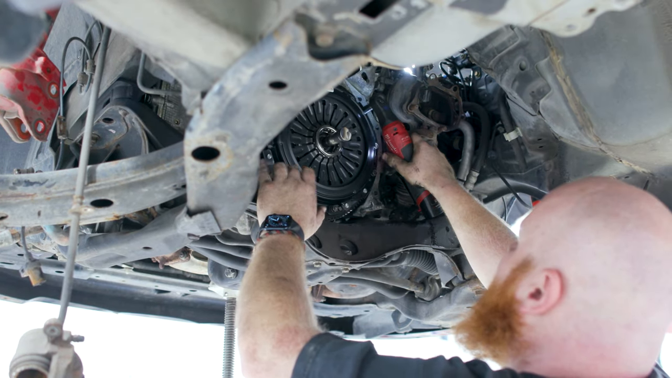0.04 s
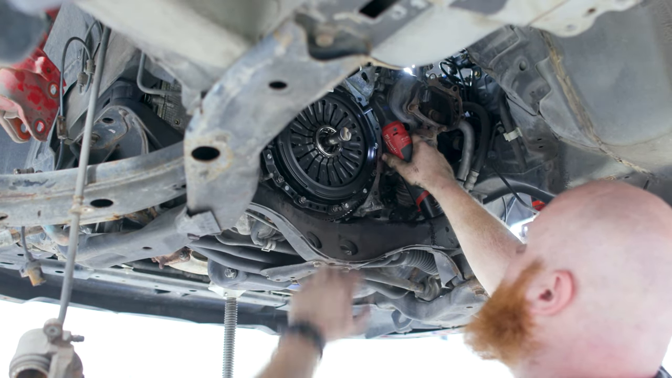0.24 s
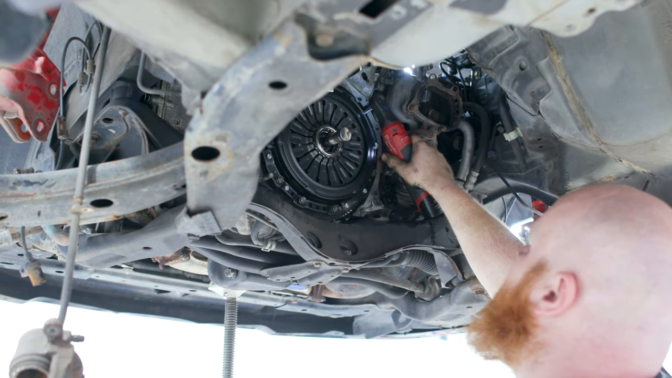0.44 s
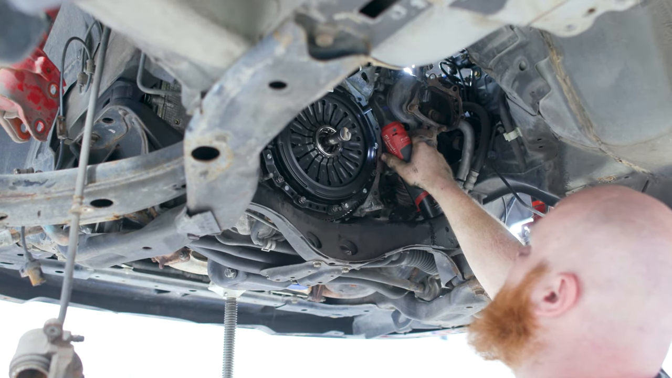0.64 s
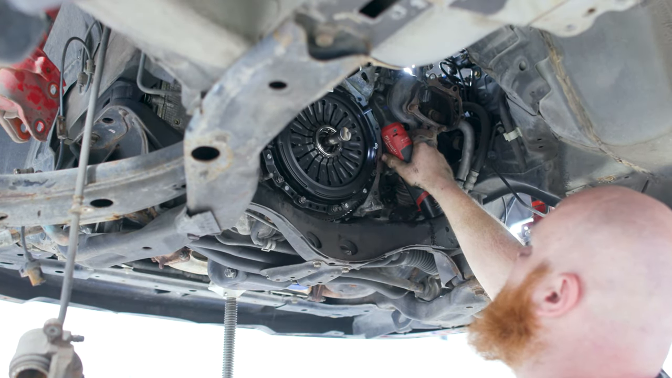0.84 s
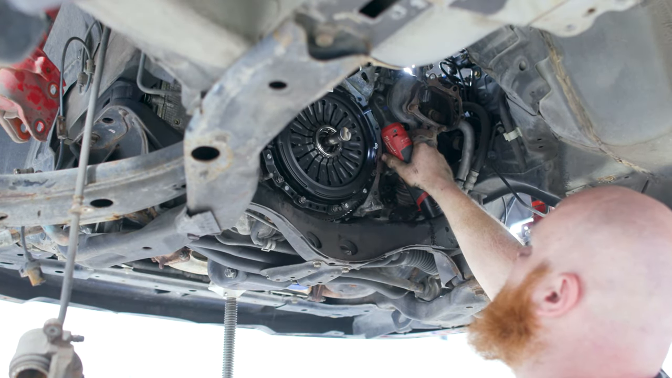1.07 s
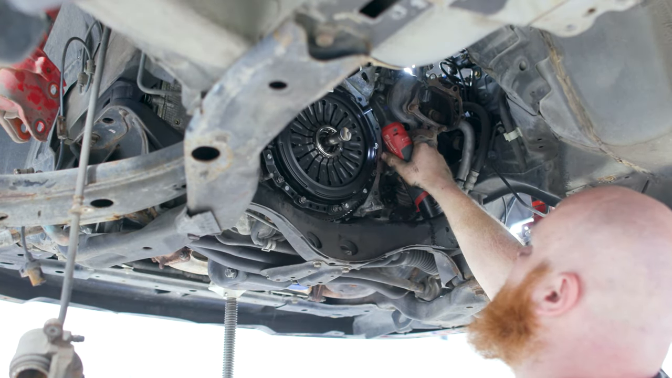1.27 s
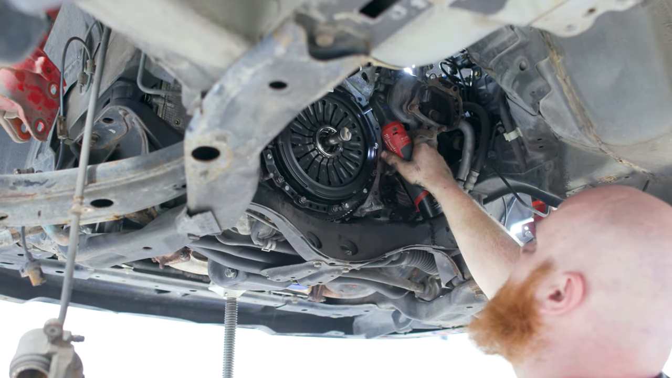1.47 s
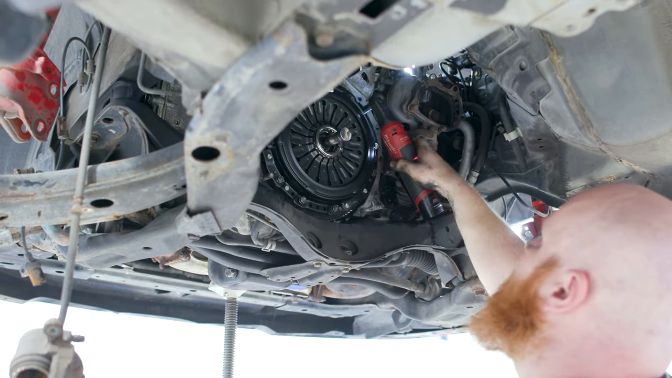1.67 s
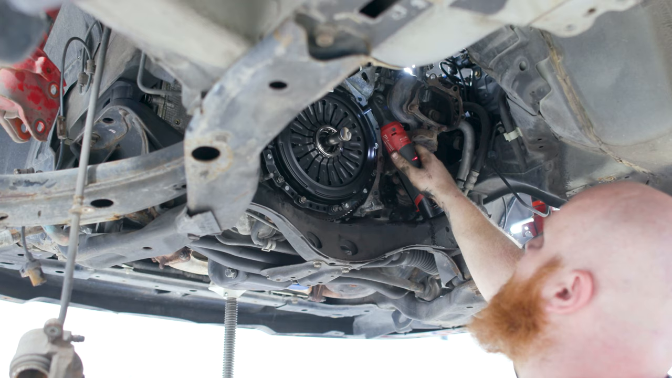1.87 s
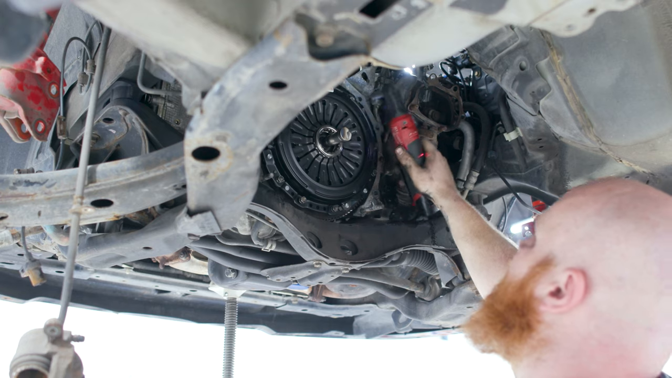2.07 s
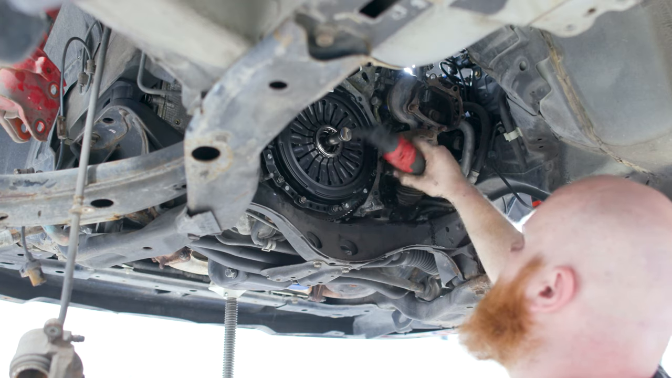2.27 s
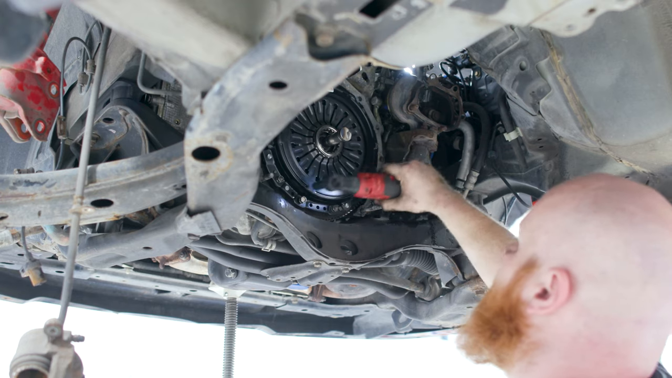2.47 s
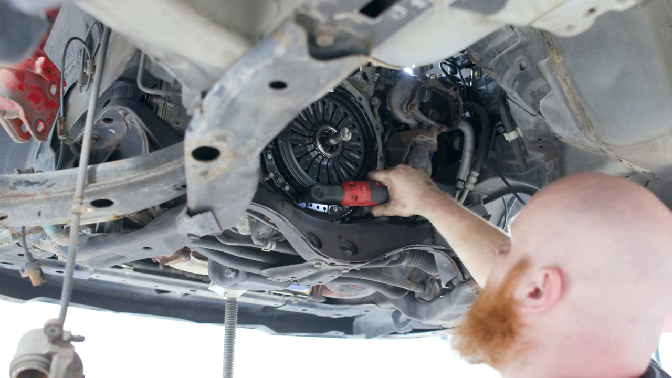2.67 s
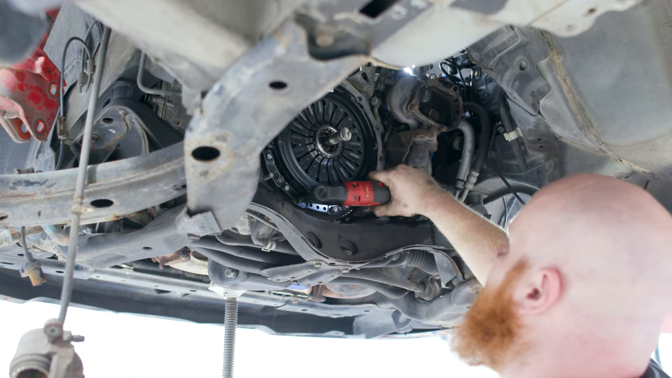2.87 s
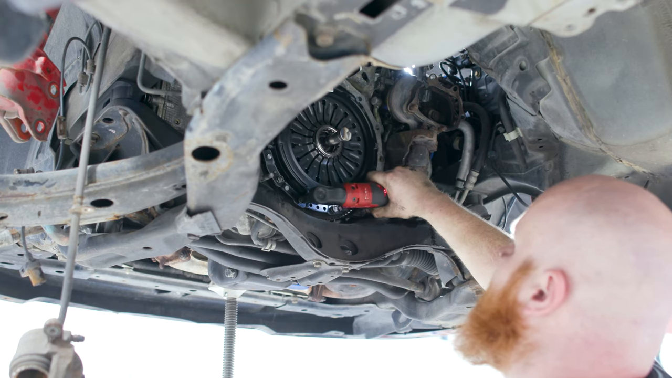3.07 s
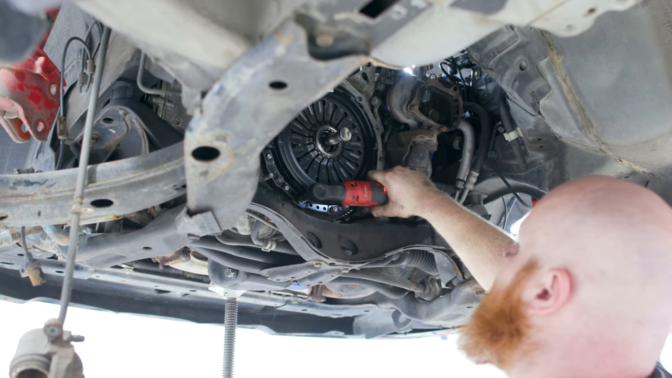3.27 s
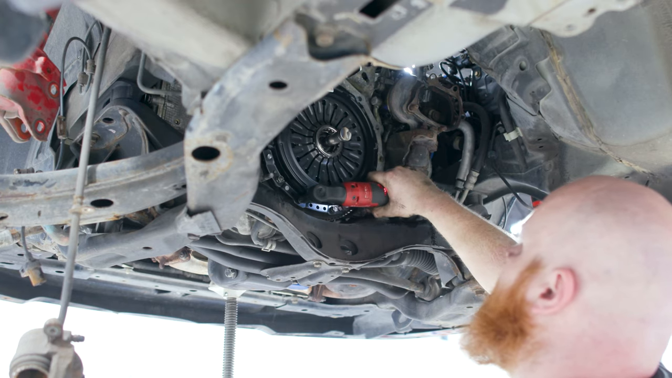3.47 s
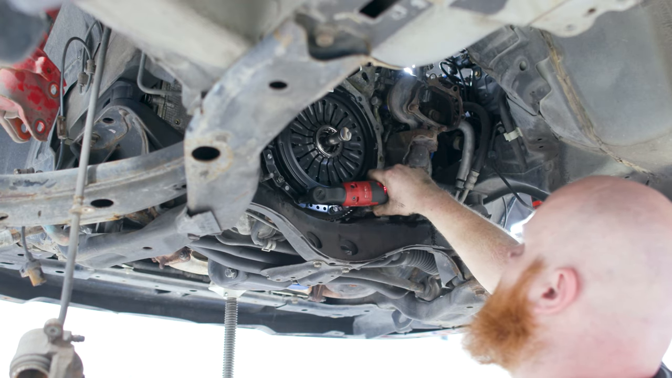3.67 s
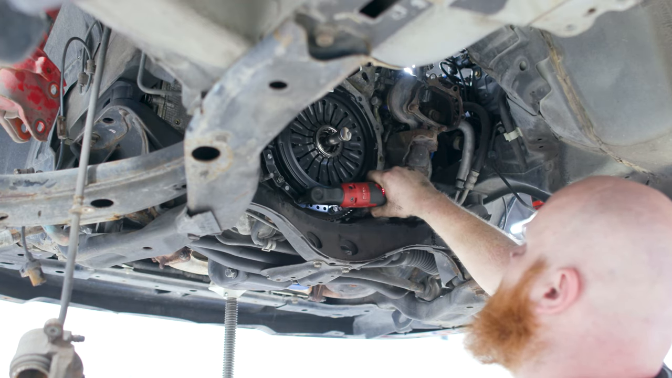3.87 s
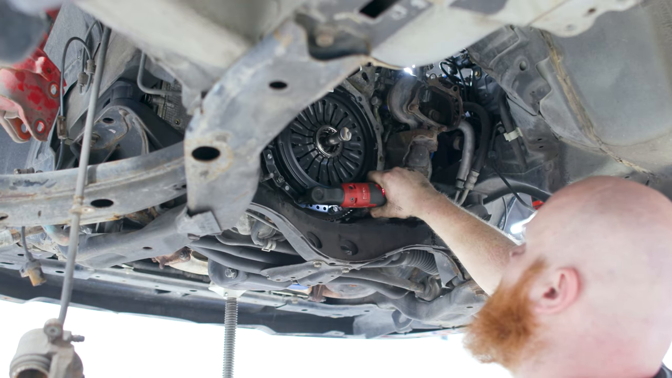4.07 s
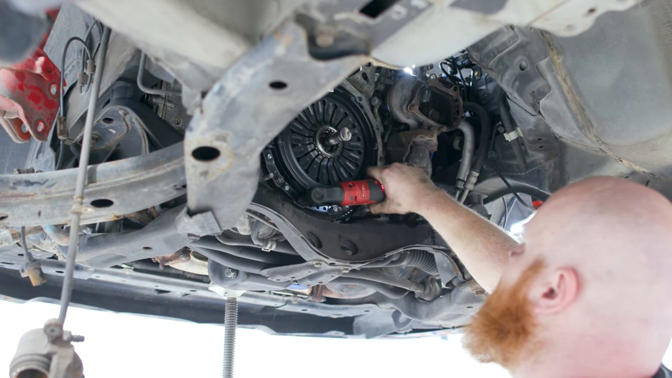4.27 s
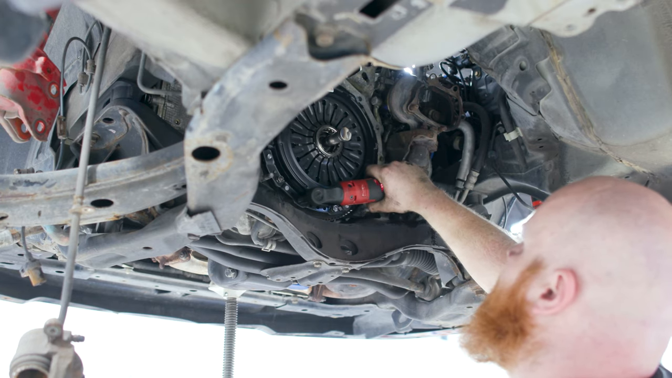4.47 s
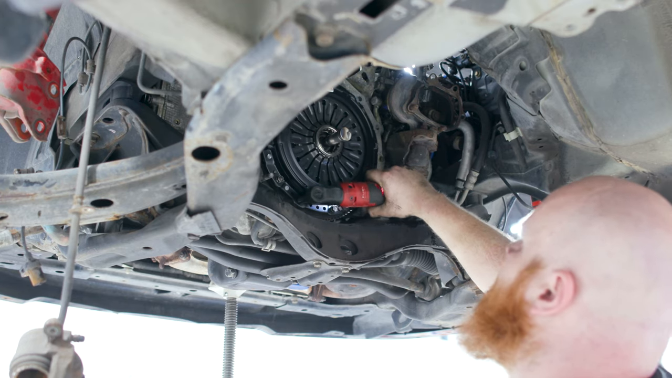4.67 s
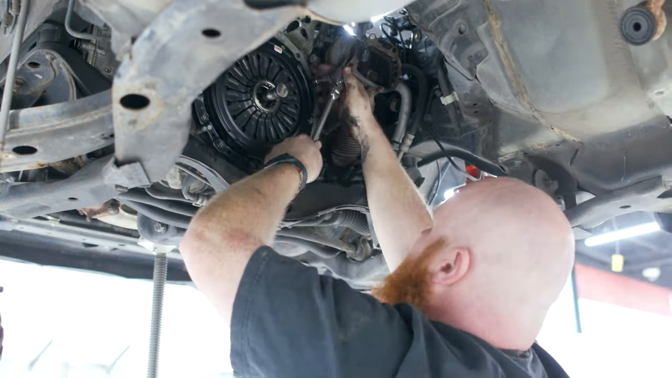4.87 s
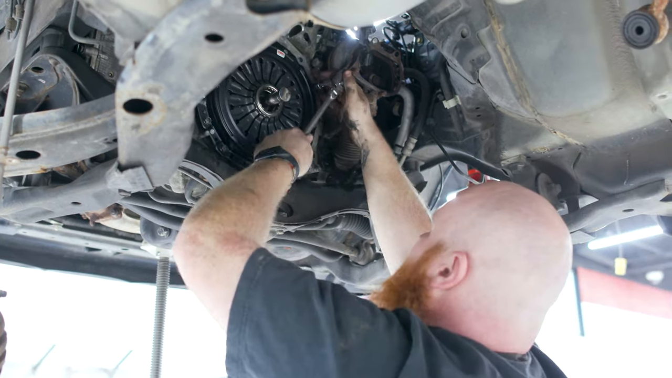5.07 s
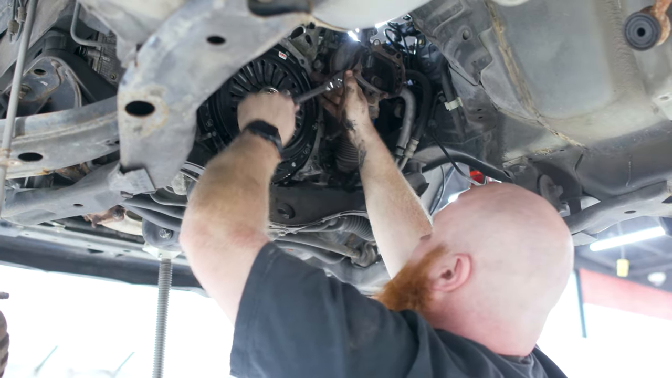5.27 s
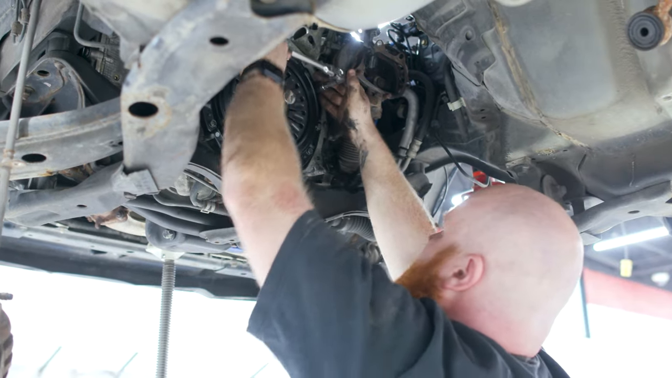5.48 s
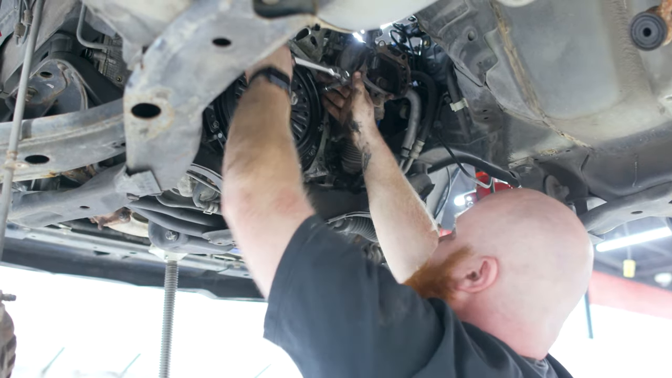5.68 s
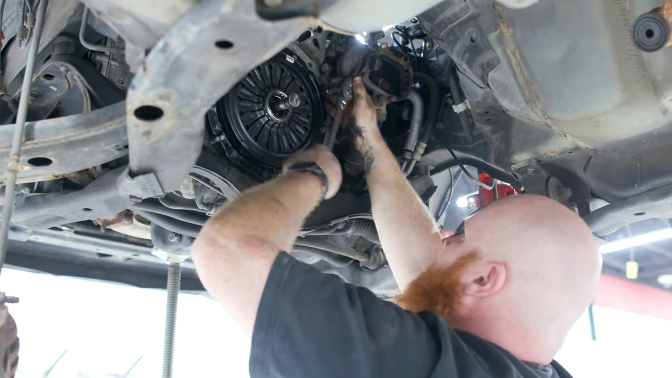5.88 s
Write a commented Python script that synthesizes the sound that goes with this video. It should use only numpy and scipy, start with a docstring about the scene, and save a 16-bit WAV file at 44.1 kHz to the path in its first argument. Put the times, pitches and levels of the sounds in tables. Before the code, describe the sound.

Three harsh buzzing bursts of an electric ratchet tightening bolts, small metal clinks and rattles between them, then faint hand rustles in a humming workshop.

```python
"""Electric ratchet under a car

A cordless ratchet runs three bursts on the bolts of a clutch cover; the first and third slow far down as the bolt tightens.
The crank rocks the pawl once a turn: knocks ring cover, socket and body, gear noise rasps, the motor drive whistles.
Socket and hands clink, rattle and brush between bursts. A fan drones; noise tails give the workshop walls' answer."""
import sys
import numpy as np
from scipy import signal
from scipy.fft import rfft, irfft, next_fast_len
from scipy.io import wavfile
from scipy.ndimage import map_coordinates

SR = 44100
rng = np.random.default_rng(int(sys.argv[2]) if len(sys.argv) > 2 else 0)


def dump_mix(stems):
    """Bounce the given channels to the path in sys.argv[1] as a 16-bit WAV at rate SR."""
    frames = np.atleast_2d(stems).T  # one column per channel
    limited = np.clip(frames, -1, 1)  # hard clip at full scale
    pcm = np.round(limited * 32767).astype(np.int16)
    wavfile.write(sys.argv[1], SR, pcm)


def attenuation_scalar(level_db):
    """Turn a level in dB into a linear amplitude multiplier (20 dB per decade)."""
    decades = np.asarray(level_db, float) / 20
    return 10 ** decades


N = 261072
T = np.arange(N) / SR
FREE_TURNS_PER_S = 123  # crank without load

# crank speed, one list per burst: t/s, speed/(turns per s)
CRANK_SPEED = [
    [(.245, 1), (.31, 55), (.36, 99), (.446, 119.5), (.522, 117.7), (.618, 107.6), (.745, 107), (.805, 77),
     (1.07, 59), (1.29, 33)],
    [(3.092, 1), (3.148, 82), (3.216, 103), (3.278, 107), (3.348, 121), (3.4, 121), (3.51, 113)],
    [(3.82, 1), (3.885, 72), (3.944, 107.5), (4.044, 122.6), (4.174, 123.5), (4.29, 99), (4.364, 63),
     (4.49, 41), (4.63, 12)],
]
# the pawl's final push, one per burst: t/s
LAST_PUSH_S = [1.277, 3.49, 4.614]
# return contact of the pawl: load/(0-1), strength/(0-1)
RETURN_CONTACT = [(0, 0.54), (.3, 0.3), (.5, 0.7), (.68, 0.5), (.85, 0.1)]


def unit(x):
    """Scaled to rms 1."""
    return x / np.sqrt(np.mean(x ** 2) + 1e-20)


def along(points, hz):
    """(Hz, value) points read on a log frequency axis."""
    f, v = np.transpose(points)
    return np.interp(np.log(hz + 1), np.log(f + 1), v)


def curves(rows, t=T):
    """One value per sample for each column after the first."""
    s, *cols = np.transpose(rows)
    return [np.interp(t, s, c) for c in cols]


def wobble(rate_hz, size=N):
    """Smooth random curve, rate_hz knots a second."""
    return map_coordinates(rng.standard_normal(size // 50), [np.arange(size) * rate_hz / SR])


def filtered(x, response):
    """x times a complex response of frequency."""
    m = next_fast_len(len(x) + 8192)
    return irfft(rfft(x, m) * response(np.fft.rfftfreq(m, 1 / SR)), m)[:len(x)]


def resonance(f, hz, width_hz):
    """Causal resonance of peak gain 1."""
    return 1j * f * width_hz / (hz * hz - f * f + 1j * f * width_hz)


def add(into, start_s, sound):
    """Mixes sound in from start_s."""
    part = into[round(start_s * SR):][:len(sound)]
    part += sound[:len(part)]


def crank_turns(crank, last_s, t):
    """Crank angle in turns: integrated speed, zero at the last push."""
    turns = np.cumsum(curves(crank, t)[0]) / SR
    return turns - np.interp(last_s, t, turns)


def load_of(crank, t):
    """Load: share of the free speed lost since the fastest moment so far."""
    speed = curves(crank, t)[0]
    return (np.maximum.accumulate(speed) - speed) / FREE_TURNS_PER_S


def strokes(turns, lag, scatter_db):
    """Random strength per sample, held for the turn that starts at lag."""
    strength = attenuation_scalar(scatter_db * rng.standard_normal(400))
    return strength[(np.floor(turns - lag) % 400).astype(int)]


def knocks(turns, back):
    """Impulses as the pawl bites and bounces, and as it returns, much alike from turn to turn."""
    # landing and bounces of the pawl: lag/turn, level/dB
    bite = [(0, 0), (.08, -9), (.21, -9)]
    turns = turns + .011 * wobble(60, size=len(turns))

    def blow(lag):
        """One impulse each time the crank passes lag."""
        passes = np.diff(np.floor(turns - lag), prepend=np.floor(turns[0] - lag))
        return passes * strokes(turns, lag, 1.8)

    return unit(sum(attenuation_scalar(db) * blow(lag) for lag, db in bite) + 0.89 * back * blow(.55))


def chatter(turns, depth, back, grit_db, sharp):
    """Rough tooth contact: noise that swells at the pawl's push and again at its return."""
    turns = turns + 0.019 * wobble(60, size=len(turns))
    bump = lambda lag: np.exp(sharp * (np.cos(2 * np.pi * (turns - lag)) - 1))
    stroke = unit(strokes(turns, .5, 0.94) * bump(0) + back * bump(0.57))
    grit = attenuation_scalar(grit_db * wobble(700, size=len(turns)))  # single teeth knock harder than others
    return unit((1 - depth + depth * stroke) * grit * rng.standard_normal(len(turns)))


def rasp(turns, depth, back, head):
    """Gear chatter coloured by the rasp spectrum and the tool head's modes."""
    # gear rasp spectrum: f/Hz, relative density/dB
    rasp_colour = [(600, -49), (1000, -15), (1400, -13), (2500, -9), (4880, -7.5), (7700, -14), (9000, -24),
                   (11700, -33), (19800, -120)]
    teeth = chatter(turns, depth, back, grit_db=2.0, sharp=1.6)

    def colour(f):
        modes = sum(attenuation_scalar(db) * resonance(f, hz, w) for hz, w, db in head)
        return attenuation_scalar(along(rasp_colour, f)) * (1 + 1.3 * modes)

    return unit(filtered(teeth, colour))


def fizz(turns, depth, back):
    """High noise of brushes and motor fan, which follows the stroke less closely."""
    # fizz spectrum: f/Hz, relative density/dB
    fizz_colour = [(4710, -17.5), (8000, -2), (9250, -5), (11100, -4), (14700, -17.5), (15600, -15.5)]
    hiss = chatter(turns, 0.54 * depth, back, grit_db=1.9, sharp=2.9)
    return unit(filtered(hiss, lambda f: attenuation_scalar(along(fizz_colour, f))))


def ratchet():
    """Each burst: rasp, fizz above it, and knocks and chatter ringing cover, socket and body."""
    # one list per burst: t/s, rasp level/dB
    effort = [
        [(.24, -62), (.256, -42.5), (.358, -16), (.596, -14.5), (.74, -15.5), (.82, -18), (1.1, -21.5),
         (1.283, -22.5), (1.3, -38.5)],
        [(3.08, -70), (3.092, -46), (3.13, -30.5), (3.182, -17.5), (3.42, -15), (3.48, -17.5), (3.512, -43),
         (3.52, -44)],
        [(3.82, -69.5), (3.845, -42.5), (3.89, -22.5), (3.962, -15.5), (4.284, -13.5), (4.45, -22),
         (4.56, -22.5), (4.62, -26), (4.64, -47.5)],
    ]
    # tool head modes, one list per burst: f/Hz, width/Hz, relative level/dB
    heads = [
        [(3850, 98, -4), (4530, 82, -7), (4800, 51, -1.5), (5960, 89, -5), (7400, 42, -2), (7580, 31, -1.5),
         (7600, 32, -0.5)],
        [(3370, 23, 0), (4100, 90, -4.5), (5000, 15, -12.5), (5900, 37, 5.5), (6800, 28, 1.5), (6996, 21, 5),
         (8450, 49, -1.5)],
        [(2600, 170, -11), (3770, 140, -21.5), (4750, 87, -11), (5350, 76, -0.5), (5870, 100, 1),
         (6860, 68, -13.5), (8340, 78, 0)],
    ]
    # body knock, cover boom, bracket, cover ring, socket ring, one list per burst:
    # f/Hz, width/Hz, then level against the rasp/dB at each load in turn
    rings = [
        [(553, 42, -29.5, -16, -13, -20), (672, 66, -13.5, -8, -4, -7), (862, 73, -19, -14, -9, -9.5),
         (1180, 170, -15, -7.5, -2.5, -7.5), (2010, 130, -6.5, -14.5, -20, -14)],
        [(560, 45, -26, -25), (678, 130, -19.5, -19.5), (846, 98, -18.5, -19), (1225, 50, -11, -8),
         (2010, 350, -22, -20)],
        [(500, 180, -25.5, -15, -7.5, -12.5), (748, 230, -16.5, -10, -6.5, -1), (1063, 92, -20, -11.5, 0, -4),
         (1199, 54, -16.5, -5, -13, -17.5), (2010, 340, -18, -10.5, -10, -9)],
    ]
    # running free, biting, labouring, stalling: load/(0-1)
    loads = [.08, .22, .55, .85]
    # fizz against the rasp at each load, motor up to speed: level/dB
    fizz_levels = [-4.5, -9, -6, -8.5]
    # how deep each stroke cuts the rasp: load/(0-1), depth/(0-1)
    stroke_depth = [(0, 0), (.3, 0.2), (.55, 0.6), (.7, 0.7), (.85, .95)]
    # share of clean knocks against chatter from 48 turns/s up, one per ring: share/(0-1)
    clean_share = [.8, .85, .75, .65, .25]

    out = np.zeros(N)
    for crank, last_s, levels, head, modes in zip(CRANK_SPEED, LAST_PUSH_S, effort, heads, rings):
        t = T[(T >= levels[0][0]) & (T < levels[-1][0])]
        speed, load = curves(crank, t)[0], load_of(crank, t)
        depth, back = curves(stroke_depth, load)[0], curves(RETURN_CONTACT, load)[0]
        turns = crank_turns(crank, last_s, t)
        sound = rasp(turns, depth, back, head)

        spin_up = 1 - np.maximum.accumulate(speed) / FREE_TURNS_PER_S
        fizz_db = np.interp(load, loads, fizz_levels) - 7 * spin_up  # weaker until up to speed
        sound += attenuation_scalar(fizz_db) * fizz(turns, depth, back)

        clean = knocks(turns, back)
        rough = chatter(turns, 0.7 * depth, back, grit_db=-1.5, sharp=1.6)
        steady = np.clip(speed / 48, 0, 1)  # a labouring pawl drags instead of striking
        for (hz, w, *dbs), full_share in zip(modes, clean_share):
            share = full_share * steady
            blows = np.sqrt(share) * clean + np.sqrt(1 - share) * rough
            seat_db = 1.2 * wobble(10, size=len(t))  # the socket's seat on the bolt keeps shifting
            ring = unit(filtered(blows, lambda f: resonance(f, hz, w) * resonance(f, hz, 4 * w)))
            sound += attenuation_scalar(np.interp(load, loads[:len(dbs)], dbs) + seat_db) * ring
        add(out, t[0], attenuation_scalar(curves(levels, t)[0]) * sound)
    return out


def whistle():
    """The drive's switching tone forks into two as the rotor speeds up, and holds one pitch at stall."""
    # trigger squeezes: t/s, upper level/dB, lower level/dB
    squeezes = [(0.226, -37.5, -37), (3.066, -36, -46), (3.813, -37.5, -45.5)]
    # stall tones: t/s, length/s, level/dB
    stalls = [(1.281, .06, -44), (4.554, .035, -42), (4.638, 0.04, -47)]
    drive_hz, fork_per_turn = 7950, 11.5
    rise_s, hold_s, fall_s = .035, .04, .04
    # the fork follows the first 0.3 s of each burst
    speed = sum(curves(c)[0] * (T > c[0][0]) * (T < c[0][0] + .3) for c in CRANK_SPEED)
    fork = fork_per_turn * np.cumsum(speed) / SR
    tone = lambda sign: attenuation_scalar(1.5 * wobble(80)) * np.sin(2 * np.pi * (drive_hz * T + sign * fork))
    upper, lower = tone(1), tone(-1)

    out = np.zeros(N)
    corners_s = np.cumsum([0, rise_s, hold_s, fall_s])
    for s, upper_db, lower_db in squeezes:
        shape = np.interp(T - s, corners_s, [0, 1, 1, 0]) ** 2
        out += shape * (attenuation_scalar(upper_db) * upper + attenuation_scalar(lower_db) * lower)
    for s, span_s, db in stalls:
        shape = np.interp(T - s, [0, .01, span_s - .01, span_s], [0, 1, 1, 0])
        out += attenuation_scalar(db) * shape * upper
    return out


def frame_shake():
    """In the first burst the pawl's knocks pick out whichever crank orders fall on the frame's low modes."""
    # frame shake: t/s, level/dB
    shake = [(0.3, -37.5), (0.43, -45.5), (0.528, -27.5), (0.582, -46.5), (0.748, -30.5), (0.832, -32),
             (1.002, -31.5), (1.3, -27.5), (1.38, -41)]
    # car frame modes: f/Hz, width/Hz, relative level/dB
    frame_modes = [(115, 33, 3.5), (213, 68, -0.5), (285, 300, -11)]
    t = T[(T >= shake[0][0]) & (T < shake[-1][0])]
    crank = CRANK_SPEED[0]
    back = curves(RETURN_CONTACT, load_of(crank, t))[0]
    blows = knocks(crank_turns(crank, LAST_PUSH_S[0], t), back)
    body = lambda f: sum(attenuation_scalar(db) * resonance(f, hz, w) * resonance(f, hz, 3 * w)
                         for hz, w, db in frame_modes)
    hum = unit(filtered(blows, body))
    out = np.zeros(N)
    add(out, t[0], attenuation_scalar(curves(shake, t)[0]) * signal.windows.tukey(len(t), .1) * hum)
    return out


def contacts(rows, rise_s, t60_s):
    """Metal contact: decaying noise round the contact's pitch, plus the steel's modes at new strengths."""
    # cover and socket modes: f/Hz, relative level/dB, t60/s
    steel = [(820, -3, .05), (1195, 0, .2), (1836, -11, .12), (2525, -13, .1), (3429, -11, .14),
             (3800, -10, .14), (4260, -12, .12), (4930, -11, .12), (5900, -15, .08), (11220, -12, .1)]
    out, t = np.zeros(N), T[:SR // 3]
    onset = 1 - np.exp(-t / rise_s)
    for s, db, hz, w, ring_db in rows:
        uneven_db = 3 * wobble(400, size=len(t))
        noise = onset * attenuation_scalar(-60 * t / t60_s + uneven_db) * rng.standard_normal(len(t))
        band = lambda f: resonance(f, hz, w) * resonance(f, hz, 2 * w) / (1 + (f / 10000) ** 2)
        rattle = filtered(noise, band)
        ring = np.zeros(len(t))
        for f, mode_db, mode_t60_s in steel:
            # loose contact smears each mode
            blur = 1.1 * wobble(90, size=len(t)) + rng.uniform(0, 2 * np.pi)
            near = abs(resonance(f, hz, .4 * hz))  # modes close to the contact's pitch ring most
            decay = attenuation_scalar(mode_db + rng.normal(0, 2.5) - 60 * t / mode_t60_s)
            ring += decay * near * np.sin(2 * np.pi * f * t + blur)
        ring *= onset * (1 - np.exp(-t / 0.0013))
        add(out, s, attenuation_scalar(db) * (rattle / np.abs(rattle).max() + attenuation_scalar(ring_db) * ring))
    return out


def clinks():
    """Socket, trigger and hand contacts: quick onset, short decay."""
    # t/s, noise peak/dB, centre f/Hz, width/Hz, cover ring against it/dB
    clink_rows = [(0.158, -42, 2980, 3973, -11), (1.51, -36, 2260, 1950, -18.5),
                  (1.758, -32.5, 5070, 5000, -16), (2.003, -36.5, 1690, 1485, -17),
                  (2.058, -37, 4780, 2517, -0.5), (2.198, -47.5, 1220, 900, -12),
                  (2.718, -18, 2574, 3612, 0), (2.944, -34, 1250, 3860, -4.5),
                  (3.017, -51, 5980, 4940, -11.5)]
    return contacts(clink_rows, rise_s=0.0016, t60_s=0.07)


def rattles():
    """Looser contacts as the tool runs down: slower onset, longer decay."""
    # t/s, noise peak/dB, centre f/Hz, width/Hz, cover ring against it/dB
    rattle_rows = [(1.345, -28, 1160, 3100, -19), (1.365, -41.5, 4960, 6910, -31.5),
                   (1.441, -41.5, 5830, 6190, -12), (4.673, -36, 4500, 6910, -28.5),
                   (4.738, -39, 2010, 5950, -30), (4.822, -41, 2530, 2850, -2)]
    return contacts(rattle_rows, rise_s=0.0099, t60_s=0.1)


def brushes():
    """Sleeves and hands on metal: soft bands of uneven friction noise."""
    # start t/s, end t/s, level/dB, centre f/Hz, width/Hz
    rubs = [(1.633, 1.954, -62.5, 2600, 1400), (2.197, 2.338, -71, 7970, 6000),
            (2.432, 2.568, -63, 523, 300), (4.995, 5.074, -73, 3190, 500), (5.597, 5.702, -68, 4870, 6100),
            (5.75, 5.79, -65, 5000, 2500), (5.792, 5.929, -58.5, 5000, 1956),
            (5.79, 5.929, -60.5, 8140, 2970), (5.6, 5.682, -60, 550, 200), (5.747, 5.95, -59.5, 708, 250),
            (5.86, 5.95, -63.5, 1435, 299)]
    out = np.zeros(N)
    for start_s, end_s, db, hz, w in rubs:
        size = round((end_s - start_s) * SR)
        rub = unit(filtered(rng.standard_normal(size), lambda f: resonance(f, hz, w) ** 2))
        uneven_db = 1.5 * wobble(40, size=size) + 2.5 * wobble(400, size=size)
        add(out, start_s, attenuation_scalar(db + uneven_db) * signal.windows.tukey(size, .15) * rub)
    return out


def walls(x):
    """Each frequency of the workshop's answer dies at its own speed; a new noise tail every 0.25 s."""
    # wall decay: f/Hz, t60/s
    wall_decay = [(300, 0.48), (1200, 1), (4000, 0.65), (12000, 0.11)]
    out, hop = np.zeros(N), SR // 4
    for start in range(0, N, hop):
        hz, t, z = signal.stft(rng.standard_normal(SR), SR, nperseg=256)
        decay = attenuation_scalar(-60 * t / along(wall_decay, hz)[:, None])
        tail = signal.istft(z * decay, SR, nperseg=256)[1]
        answer = signal.fftconvolve(x[start:start + hop], tail / np.linalg.norm(tail))
        add(out, start / SR + 0.011, answer)
    return out


def shop_air():
    """A fan's wavering blade tone over its rush and distant rumble, both shaped noise."""
    # workshop air: f/Hz, relative density/dB
    air_colour = [(12, -37.5), (20, -23), (49, -9), (78, -29), (95, -9.5), (120, -11), (155, -5.5),
                  (190, -18.5), (290, -19.5), (430, -31.5), (900, -32.5), (2340, -44.5), (15600, -57.5)]
    # blade tone: f/Hz, level/dB before a 2.5 dB lift
    blade_hz, blade_db = (117, -43.5)
    phase = 2 * np.pi * np.cumsum(blade_hz + 1.5 * wobble(4.0)) / SR
    blade = attenuation_scalar(blade_db + 2.5 + 1.0 * wobble(4.9)) * np.sin(phase)
    air = unit(filtered(rng.standard_normal(N), lambda f: attenuation_scalar(along(air_colour, f))))
    return blade + attenuation_scalar(-45.5 + 0.82 * wobble(2.3)) * air


def scene():
    """Tool and contacts close to the microphone, the workshop behind them."""
    near = ratchet() + whistle() + clinks() + rattles()
    return (near + attenuation_scalar(-21) * walls(near) + frame_shake() + brushes() + shop_air())[None]


def top_cut(x):
    """Nothing passes above the cut-off."""
    return signal.sosfilt(signal.butter(12, 15710, fs=SR, output="sos"), x)


def record(dry):
    """Band limit at 15.75 kHz, then soft clipping of the highest peaks."""
    x = filtered(dry[0], lambda hz: hz < 15750)[None]
    x = x / (1 + np.abs(x) ** 8) ** (1 / 8)
    return top_cut(x)


dry = scene()
out = record(dry)
dump_mix(out)
```